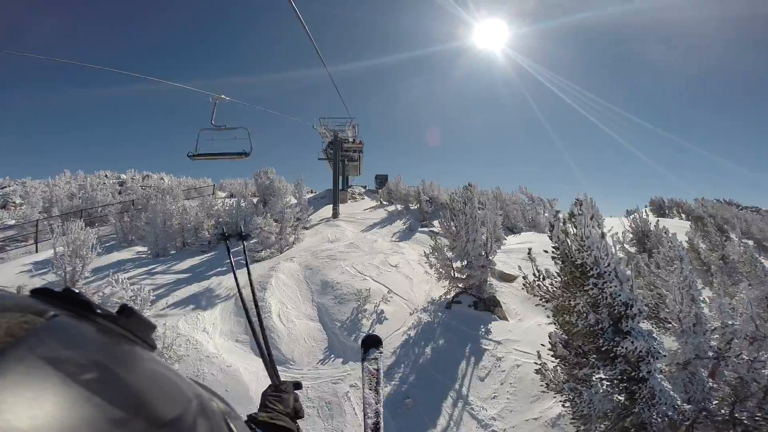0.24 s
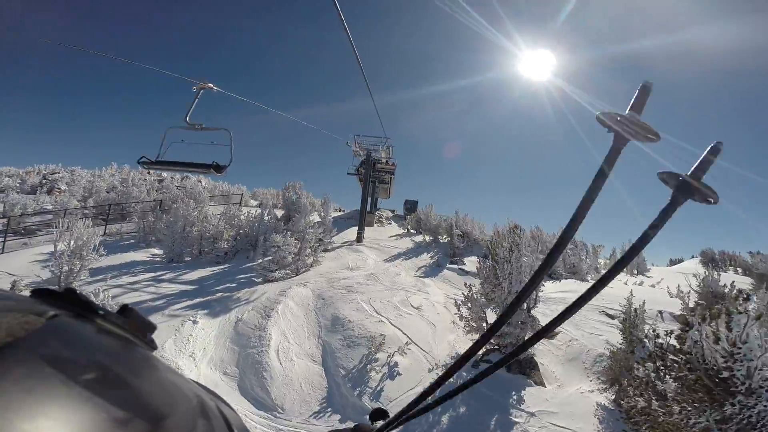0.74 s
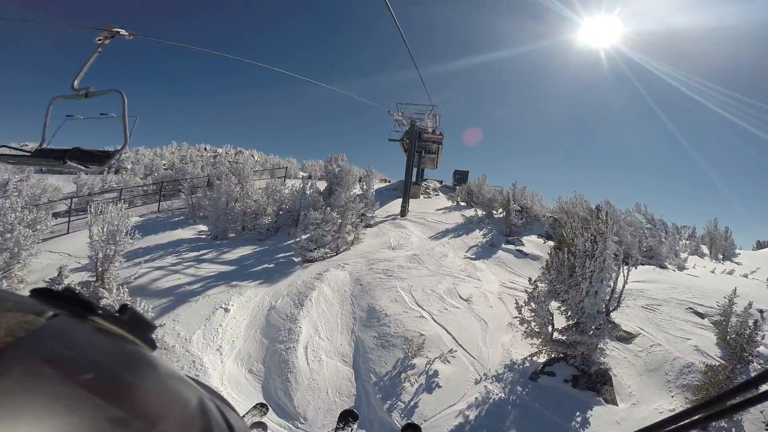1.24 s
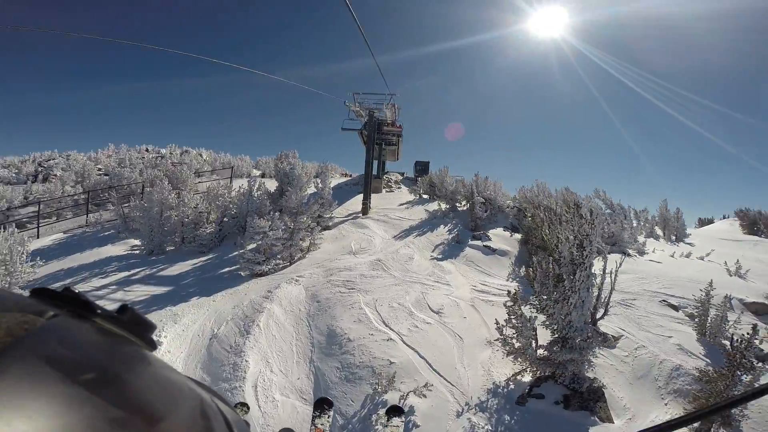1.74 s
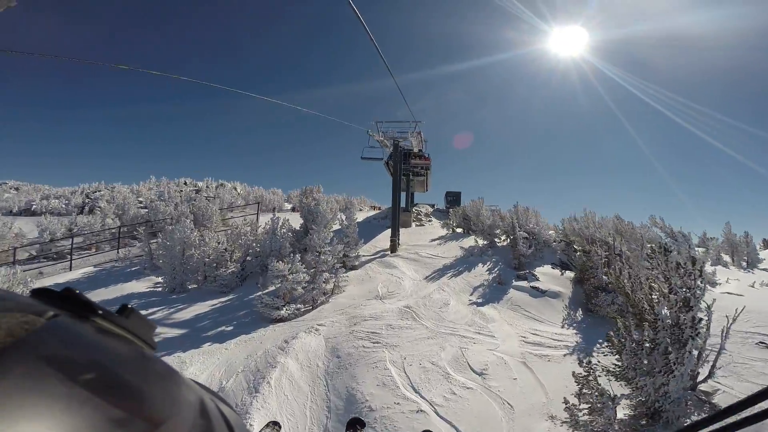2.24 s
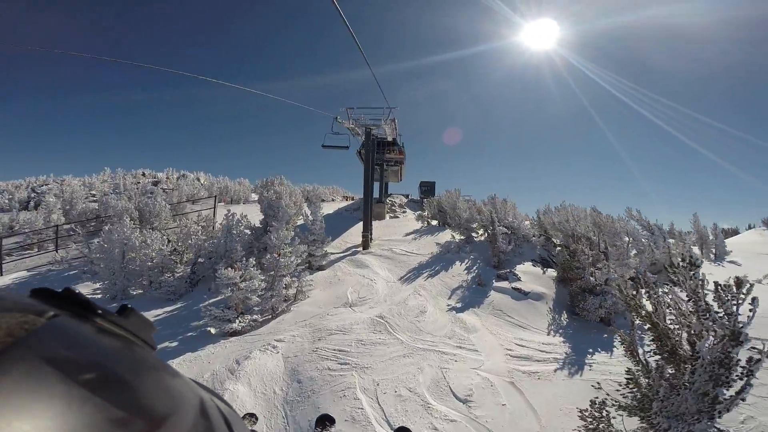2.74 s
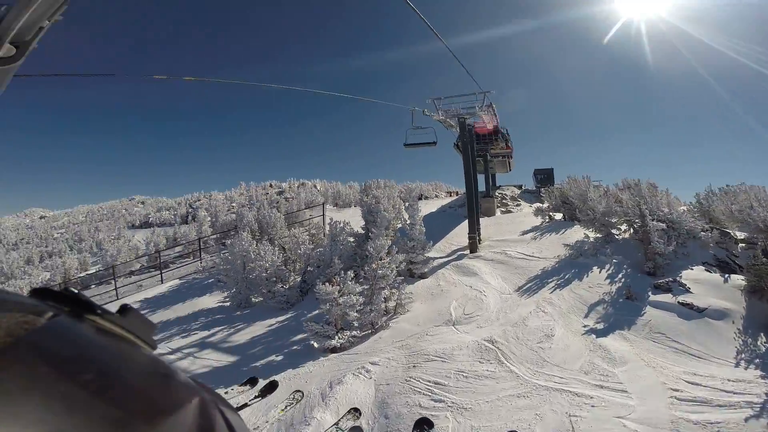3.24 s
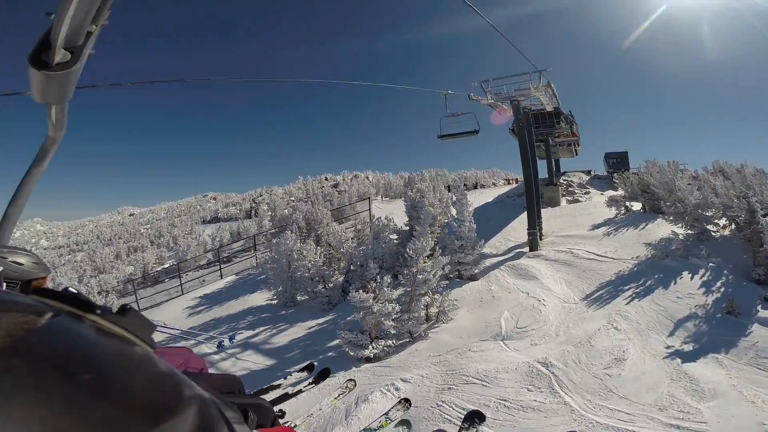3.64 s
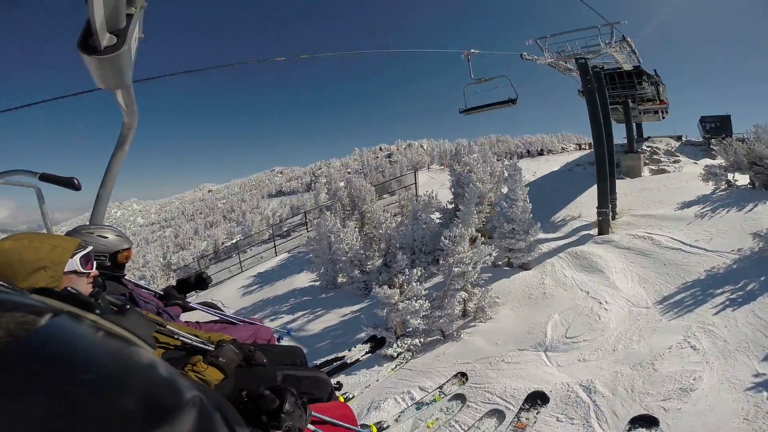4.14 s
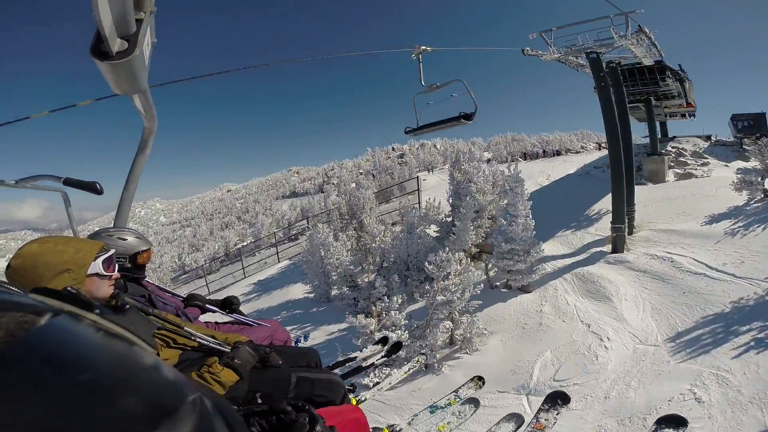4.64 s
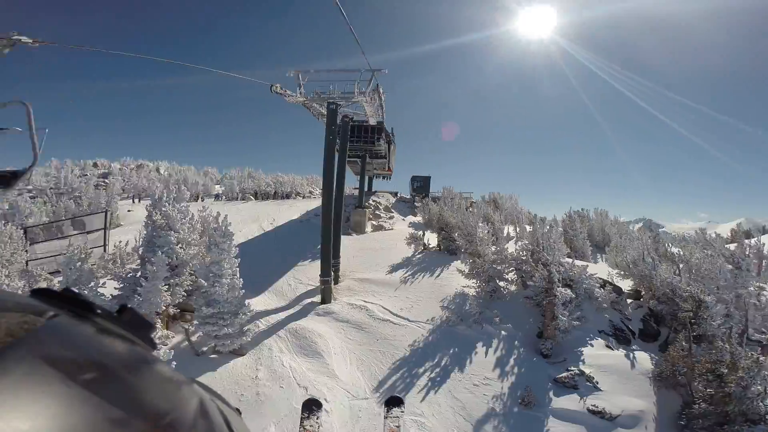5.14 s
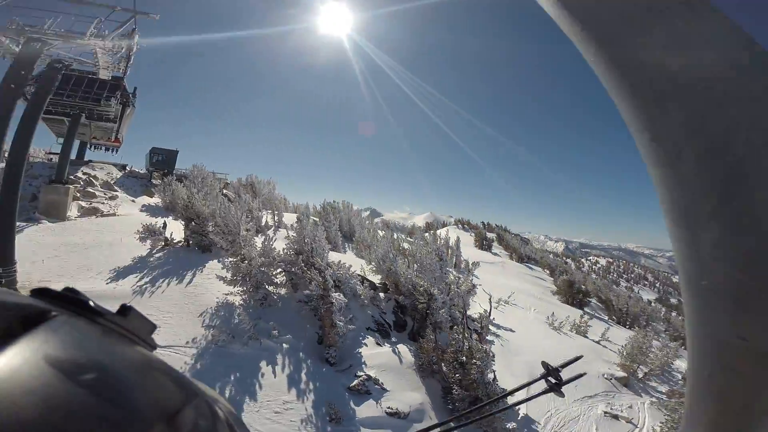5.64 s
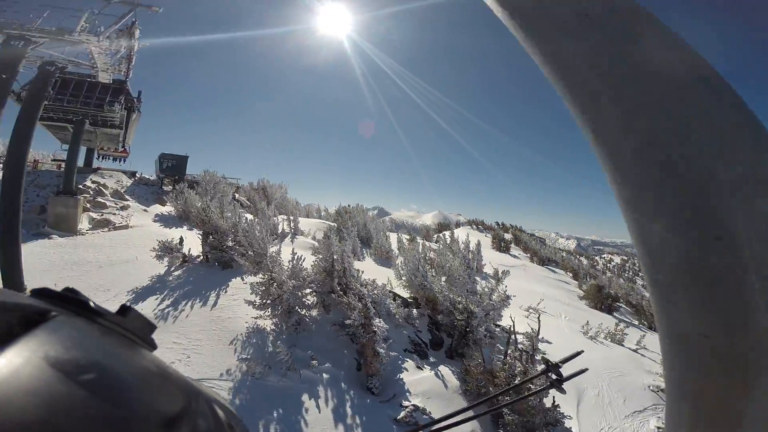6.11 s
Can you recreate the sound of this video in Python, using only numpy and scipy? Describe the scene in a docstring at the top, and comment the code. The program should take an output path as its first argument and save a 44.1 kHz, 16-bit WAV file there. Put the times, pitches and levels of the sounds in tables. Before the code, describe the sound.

Muffled chairlift ride with low wind rumble and hiss, a rough mid-high whirr swelling mid-way, then ticks, hollow pole scrapes and knocks.

```python
"""A ride on a ski chairlift, heard for 6.4 s by a small camera in a closed housing on a helmet.
Over frame drone, wind rumble (shaped noise) and a faint electronic whine, a few knocks and ticks come first and
a hollow pole starts to slide (noise-driven resonances). From 2.3 to 4.1 s a whirr near 1.5 kHz, one rough drive
heard through several hollows, is mostly loud. Thin rustles and the hardest buckle tick follow at 4 to 4.3 s, then
pole strokes from 4.6 s; the heaviest knocks fall after 5 s, as the whirr grows faint; drone and rumble go on."""
import sys
import numpy as np
from scipy import signal
from scipy.fft import rfft, irfft, next_fast_len
from scipy.io import wavfile
from scipy.ndimage import uniform_filter1d, map_coordinates

SR = 44100
rng = np.random.default_rng(int(sys.argv[2]) if len(sys.argv) > 2 else 0)


def dump(signal):
    """Clip the signal to [-1, 1] and save it as 16-bit WAV at the path in sys.argv[1]."""
    limited = np.clip(np.atleast_2d(signal).T, -1, 1)
    pcm = np.round(limited * 32767).astype(np.int16)
    wavfile.write(sys.argv[1], SR, pcm)


N = 281057  # samples

# Spectrum of the preamplifier hiss, before scaling to HISS_DB: freq_hz, density_db (per Hz, relative)
HISS_SPECTRUM = [(60, -46), (100, -19), (217, 2), (352, -13), (831, -18), (1660, -17.5), (4730, -29.5),
                 (5720, -27), (6220, -33.5), (9000, -37), (12700, -42.5), (13300, -41), (14200, -37.5),
                 (16000, -43)]
# Whines locked to the camera's frames: cycles_per_frame, level_db (rms)
WHINES = [(195.29, -72.5), (292.88, -78), (488.22, -79.7)]
# Slow levels of the chair and wind: start_s, drone_db, top_mode_db, rumble_db, shudder_db
CHAIR_LEVELS = [(0.0, -59, -74, -45.5, -65), (0.37, -62.5, -69, -41.5, -61), (0.67, -70, -61.5, -48, -66),
                (1.1, -58, -66, -49, -58), (1.61, -65, -77, -49, -63), (2.06, -65.5, -65, -54, -60),
                (2.52, -50.5, -57.5, -43.5, -61), (3.05, -60.5, -60.5, -48, -59),
                (3.25, -57, -56, -47, -59), (3.55, -50, -55.5, -45.5, -59),
                (3.94, -50.5, -59.5, -53.5, -65), (4.31, -53, -62, -47, -56.5),
                (4.67, -54, -60.5, -52.5, -58), (4.9, -52, -62, -47.5, -60),
                (5.38, -58.5, -55.5, -48.5, -64), (5.73, -64.5, -69, -50, -57.5),
                (6.0, -54.5, -57.5, -43.5, -52.5), (6.37, -63, -70, -55, -61.5)]
# Resonances of the chair frame, the last being its top mode: freq_hz, width_hz, gain_db
FRAME_MODES = [(151, 62, -9.5), (224.4, 32, 2), (281, 68, -8)]
# Spectrum of the wind rumble: freq_hz, density_db (per Hz, relative)
RUMBLE_SPECTRUM = [(4.7, -33), (8.0, -7), (24, -4), (34, -10), (45, -13), (59, -24.5), (70, -35), (91, -66),
                   (150, -120)]
# Buckle ticks: start_s, burst_db, ring_hz, ring_q, length_s, dull_part_db, upper_part_db (near 7 kHz)
BUCKLE_TICKS = [(0.122, -57, 3880, 2.5, .002, 16, -11), (0.135, -56, 4200, 2.5, 0.003, 7, 1),
                (.976, -52, 3300, 3, .0025, 11, -14), (1.039, -52, 4800, 2, 0.0022, 1.5, -4),
                (1.605, -58, 4380, 2.5, 0.0028, 14, -14), (1.719, -50, 5030, 2.3, 0.0018, 4, -13),
                (2.692, -54.5, 4590, 5, 0.014, 11, 2.5), (2.76, -53, 4600, 8.8, .007, 2, -2),
                (2.819, -52, 4610, 9, .014, -4, -10), (3.53, -46.5, 4550, 1.2, 0.0088, 6, -5),
                (3.65, -46, 5260, 4, 0.0034, 4, -13), (4.088, -44, 5000, 3.3, .0026, 0, -10),
                (4.115, -55, 4700, 5, .003, 6, -11), (4.2418, -32.5, 4640, 5, 0.0054, 2, -13.5),
                (4.273, -46, 4280, 3.6, 0.0037, 3, -10), (4.489, -39.5, 4880, 5, 0.004, 0, -13),
                (5.236, -48, 5040, 5.14, 0.0028, 8, -14), (5.32, -56, 5100, 5, 0.0027, 4, -16),
                (5.357, -54, 5050, 5, 0.0034, 6, -18), (5.532, -41, 2980, 5, .0052, -14, -22)]
# Thin high rustles: start_s, onset_db (noise before its resonances)
FABRIC_RUSTLES = [(3.99, -53), (4.0183, -53), (4.06, -56), (4.118, -56), (4.177, -59)]
# Resonances of the hollow pole: freq_hz, width_hz, gain_db
POLE_MODES = [(565, 69, -2.5), (1280, 250, -6.5), (2100, 250, 3.5), (2890, 390, -1.5), (3540, 120, -3),
              (4335, 120, -5), (5140, 290, -4), (5400, 450, -10.5), (7360, 140, -34)]
# Sliding strokes of the pole: start_s, length_s, slip_force_db, lower_modes_db (re the upper modes)
POLE_STROKES = [(0.426, 0.12, -50, -1), (.8, 0.076, -47, 0.5), (1.15, .12, -56, 8.5),
                (4.651, .04, -42, -5.5), (5.033, 0.074, -44.5, -4), (5.13, 0.14, -40, -3.5),
                (5.3, .135, -42, 2), (5.457, 0.087, -47.5, -0.5), (5.575, 0.014, -47.5, 2)]
# Blows on pole and seat, as forces before the resonances: start_s, thump_db, pole_ring_db, push_s
KNOCK_BLOWS = [(0.126, -54, -38.5, .0015), (0.263, -44, -47, 0.0014), (0.518, -35.5, -60, 0.003),
               (5.01, -26.5, -36, 0.0019), (5.017, -34.5, -48, 0.0016), (5.039, -38, -37, 0.0015),
               (5.143, -35, -48, 0.0023), (5.279, -37.5, -41, .003), (5.424, -38, -33, 0.0031),
               (5.432, -36, -35, 0.0032)]
# Course of the whirr: start_s, level_db (before its fluctuations), strand_hz (centre of its wander)
WHIRR_COURSE = [(0, -63, 1459), (.3, -64, 1406), (.35, -53.5, 1426), (.5, -65.5, 1440), (.6, -52.5, 1436),
                (.88, -50, 1460), (1.1, -56.5, 1467), (1.18, -50.5, 1450), (1.35, -51, 1461),
                (1.55, -54.5, 1464), (1.68, -58.5, 1456), (1.9, -64, 1449), (2.23, -50, 1454),
                (2.33, -41.5, 1459), (2.62, -43, 1458), (2.96, -54, 1432), (3.16, -41.5, 1434),
                (3.31, -42.5, 1414), (3.37, -48, 1463), (3.47, -41.5, 1468), (3.72, -43, 1533),
                (3.88, -42, 1580), (3.99, -44.5, 1398), (4.12, -52, 1460), (4.33, -52, 1424),
                (4.42, -55.5, 1467), (4.62, -51, 1435), (4.74, -61.5, 1466), (4.82, -56.5, 1400),
                (4.91, -66.5, 1433), (5.03, -46, 1510), (5.08, -58, 1475), (5.25, -54.5, 1456),
                (5.6, -88, 1513), (5.88, -59.5, 1453), (6.15, -74, 1516), (6.37, -62.5, 1600)]
# Lower hollows that the whirr sounds in: freq_hz, width_hz, gain_db
LOWER_HOLLOWS = [(1391, 152, -3.5), (1493, 65, -5.5)]
# Upper hollows of the whirr: freq_hz, width_hz, gain_db
UPPER_HOLLOWS = [(1579, 320, -3), (1880, 95, -16.5), (2107, 39, -9.5)]
# Dull spread below the whirr: freq_hz, width_hz, gain_db
SKIRT_MODES = [(86, 160, -12), (605, 2800, -31.5), (1150, 360, -17.5)]
# Spectrum of the fizz above the whirr: freq_hz, density_db (per Hz, relative)
FIZZ_SPECTRUM = [(1290, -5.5), (2200, -2), (2900, -7), (3280, -0.5), (4540, -31), (5850, -19.5),
                 (6170, -20), (8000, -45), (10400, -70), (17600, -120)]

HISS_DB = -55  # rms
FRAME_RATE = 30000 / 1001  # camera frames per second
ROLL_HZ, TOP_HZ = 14960, 15843  # start of the treble fall, band limit
TICK_T60_S, THIN_DB = 0.013, -18  # burst decay by 60 dB; thin part re the upper part
RUSTLE_S = .012  # decay to 1/e
STROKE_RISE_S, STROKE_FALL_S = 0.023, .015  # before the start and after the end of each stroke
MID_HZ, SHOULDER_DB, SHOULDER_DB_PER_HZ = 1448, -2.5, 0.05  # the higher the strand, the louder the upper hollows
LOUD_DB, FIZZ_DB, FIZZ_GROWS = -45.5, -60, 0.96  # reference whirr, its fizz, dB of fizz per dB of whirr
FIZZ_DB_PER_HZ = -0.0005  # a higher strand fizzes slightly less


def amp(db):
    """Logarithmic level: 20 dB is a factor of ten in amplitude."""
    return 10 ** (np.asarray(db) / 20)


def unit(x):
    """Normalisation: x scaled to a root mean square of 1."""
    return x / np.sqrt(np.mean(x ** 2) + 1e-20)


def curves(rows):
    """Linear interpolation: one value per sample for each column after the time."""
    s, *cols = np.transpose(rows)
    return [np.interp(np.arange(N) / SR, s, c) for c in cols]


def wobble(rate):
    """Random modulation: a smooth curve through Gaussian knots, rate of them a second."""
    knots = rng.standard_normal(int(N * rate / SR) + 4)
    return map_coordinates(knots, [np.arange(N) * rate / SR])


def filtered(x, response):
    """Linear filtering: the spectrum of x times a response of frequency."""
    m = next_fast_len(N + SR // 2)
    return irfft(rfft(x, m) * response(np.fft.rfftfreq(m, 1 / SR)), m)[:N]


def sloped(points):
    """Spectral envelope: a response through (Hz, dB) points on a log axis."""
    f, db = np.transpose(points)
    return lambda hz: amp(np.interp(np.log(hz + 1), np.log(f + 1), db, -120, -120))


def resonant(modes, order=1):
    """Modal superposition: causal resonances of alternating sign; order 2 has steeper skirts."""
    def mode_response(f, centre, width):
        return 1j * f * width / (centre * centre - f * f + 1j * f * width)

    return lambda f: sum((-1) ** k * amp(db) * mode_response(f, centre, width) ** order
                         for k, (centre, width, db) in enumerate(modes))


def noise(patchy_db, grain_db=0.0):
    """Modulated noise: random gain over patches of time and frequency, and an optional grain over time."""
    z = signal.stft(rng.standard_normal(N + 1024), nperseg=512)[2]
    across_frequency = uniform_filter1d(rng.standard_normal(z.shape), 5, 0)
    patches = uniform_filter1d(across_frequency, 8, 1)
    x = signal.istft(z * amp(patchy_db * unit(patches)), nperseg=512)[1][:N]
    return x * amp(grain_db * wobble(300))


def electronics():
    """Periodic phase reset: whines restart with each frame, over hiss, pulsed tones and random sparks."""
    t = np.arange(N) / SR
    hiss = amp(HISS_DB) * unit(filtered(noise(patchy_db=1.3), sloped(HISS_SPECTRUM)))
    frame = (t * FRAME_RATE).astype(int)
    within = t * FRAME_RATE - frame  # position in the frame, 0 to 1
    # the restart gives each whine uneven side tones
    whine = sum(np.sqrt(2) * amp(db) * np.sin(2 * np.pi * (cycles * within + rng.random()))
                for cycles, db in WHINES)
    spark_draw, beep_draw, start = rng.random((frame[-1] + 1, 3))[frame].T
    sparking = (spark_draw < .25) * (within < .08)
    sparks = sparking * amp(-66) * rng.standard_normal(N)
    sparks = filtered(sparks, sloped([(4000, -18), (8000, 0), (16000, 2)]))
    beep_pulse = (beep_draw < .3) * np.sin(np.pi * within) ** 2
    beeps = beep_pulse * amp(-85) * np.sin(2 * np.pi * 11300 * t)
    # a chirp in every frame, of random phase
    chirp_level = np.sin(np.pi * within) ** 4 * amp(-67.5 + 2.5 * wobble(5.5))
    chirps = chirp_level * np.sin(2 * np.pi * (5621 * t + start))
    return hiss + whine + sparks + beeps + chirps


def chair():
    """Forced vibration: the running rope shakes seat and frame modes, while wind buffets the housing."""
    drone_db, top_mode_db, rumble_db, shudder_db = curves(CHAIR_LEVELS)
    shake = noise(patchy_db=2.1)
    drone = unit(filtered(shake, resonant(FRAME_MODES[:2], order=2)))
    top_mode = unit(filtered(shake, resonant(FRAME_MODES[2:], order=2)))
    shudder = unit(filtered(rng.standard_normal(N), resonant([(83.0, 69, 0)], order=2)))
    rumble = unit(filtered(rng.standard_normal(N), sloped(RUMBLE_SPECTRUM)))
    frame = amp(1.3 * wobble(8.1)) * (amp(drone_db) * drone - amp(top_mode_db) * top_mode)
    return frame + amp(shudder_db) * shudder + amp(rumble_db) * rumble


def ticks():
    """Impulse excitation: short bursts ring small hard parts; decaying noise makes fabric rustle."""
    clicks, t = np.zeros(N + SR), np.arange(SR // 10) / SR
    f = np.fft.rfftfreq(len(t), 1 / SR)
    for s, db, ring_hz, ring_q, length, dull_db, upper_db in BUCKLE_TICKS:
        burst = rng.standard_normal(len(t)) * amp(-60 * np.maximum(t - length, 0) / TICK_T60_S)
        # dull part, own ring, upper part, thin part
        voice = resonant([(2500, 1400, dull_db), (ring_hz, ring_hz / ring_q, 4), (7200, 1600, upper_db),
                          (11500, 6000, upper_db + THIN_DB)], order=2)
        clicks[round(s * SR):][:len(t)] += amp(db) * irfft(rfft(burst) * voice(f), len(t))
    rustle = np.zeros(N + SR)
    for s, db in FABRIC_RUSTLES:
        rustle[round(s * SR):][:len(t)] += amp(db) * np.exp(-t / RUSTLE_S) * rng.standard_normal(len(t))
    return clicks[:N] + filtered(rustle[:N], resonant([(9680, 1700, 2), (12700, 1540, -11)], order=2))


def pole_strokes():
    """Friction excitation: uneven slips drive the tube's modes."""
    slips = unit(noise(patchy_db=1.0, grain_db=3.0) * amp(0.87 * wobble(70)))
    clock = np.arange(N) / SR
    upper_force, lower_force = np.zeros(N), np.zeros(N)
    for s, length, force_db, lower_db in POLE_STROKES:
        corners = [s - STROKE_RISE_S, s, s + length, s + length + STROKE_FALL_S]
        shape = np.interp(clock, corners, [0, 1, 1, 0])
        upper_force += amp(force_db) * shape
        lower_force += amp(force_db + lower_db) * shape
    out = np.zeros(N)
    for mode in POLE_MODES:  # the moving contact point favours now one mode, now another
        force = upper_force if mode[0] > 4000 else lower_force
        out += amp(1.8 * wobble(14)) * filtered(force * slips, resonant([mode], order=2))
    rasp = filtered(lower_force * slips, resonant([(2920, 1900, 0)], order=2))  # dry contact
    return out + amp(-14) * rasp


def knocks():
    """Impact excitation: noisy blows ring the pole's modes as soft pushes thump the seat's."""
    blows, thumps, t = np.zeros(N + SR), np.zeros(N + SR), np.arange(SR // 10) / SR
    for s, thump_db, ring_db, push_s in KNOCK_BLOWS:
        at = round(s * SR)
        # the blow decays by 60 dB in 28 ms
        blows[at:][:len(t)] += amp(ring_db - 60 * t / 0.028) * rng.standard_normal(len(t))
        u = t / push_s
        # a soft push, then its rebound
        thumps[at:][:len(t)] += amp(thump_db) * u * (2 - u) * np.exp(-u)
    seat = resonant([(266, 118, 15.6), (570, 127, 17.2), (850, 230, 10.9)])
    return filtered(blows[:N], resonant(POLE_MODES)) + filtered(thumps[:N], seat)


def whirr():
    """Source and resonator: a rough drive sounds two sets of hollows, with a narrow strand, skirt and fizz."""
    level_db, strand_hz = curves(WHIRR_COURSE)
    level_db = level_db + 0.66 * wobble(9.9)
    above_mid_hz = strand_hz - MID_HZ
    upper = amp(SHOULDER_DB + SHOULDER_DB_PER_HZ * above_mid_hz)
    # the division offsets the power that the upper hollows add
    flutter = amp(level_db + 0.41 * wobble(24.83)) / np.sqrt(1 + upper ** 2)
    drive_shape = sloped([(900, -45), (1230, -8.0), (1310, 0.5), (20000, 3)])
    drive = filtered(noise(patchy_db=-1.5, grain_db=3.5), drive_shape)
    low = unit(filtered(drive, resonant(LOWER_HOLLOWS, order=2)))
    high = unit(filtered(drive, resonant(UPPER_HOLLOWS, order=2)))
    # random quadrature amplitudes spread a wandering tone into a narrow band
    phase = 2 * np.pi * np.cumsum(strand_hz + 15 * wobble(12)) / SR
    strand = unit(wobble(60) * np.sin(phase) + wobble(60) * np.cos(phase))
    skirt = unit(filtered(noise(patchy_db=2.0), resonant(SKIRT_MODES, order=2)))
    fizz = unit(filtered(noise(patchy_db=0.6, grain_db=2.5), sloped(FIZZ_SPECTRUM)))
    fizz_db = FIZZ_DB + FIZZ_GROWS * (level_db - LOUD_DB)
    fizz_db = fizz_db + FIZZ_DB_PER_HZ * above_mid_hz + 0.54 * wobble(15)
    body = amp(-1.0) * low + upper * high + amp(-6.5) * strand + amp(-7.5) * skirt
    return flutter * body + amp(fizz_db) * fizz


def scene():
    """Linear superposition: all sources add at one microphone."""
    return (electronics() + chair() + ticks() + pole_strokes() + knocks() + whirr())[None]


def record(dry):
    """Band limitation: the camera's treble falls away steeply near the top and ends at its limit."""
    def treble(hz):
        fall_db = np.interp(hz, [ROLL_HZ, ROLL_HZ + 60, ROLL_HZ + 400], [0, -17, -30])
        return (hz < TOP_HZ) * amp(fall_db)

    return filtered(dry[0], treble)[None]


dry = scene()
out = record(dry)
dump(out)
```